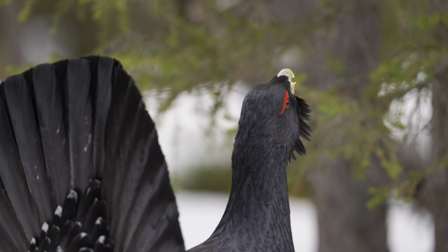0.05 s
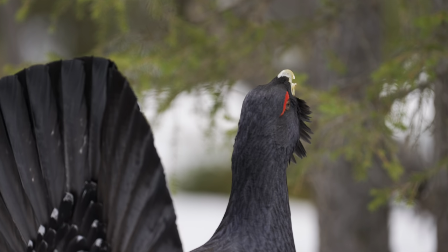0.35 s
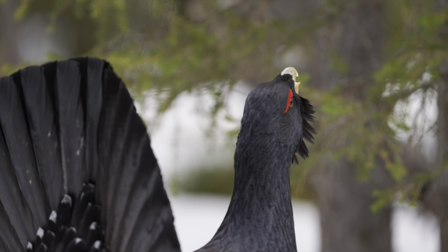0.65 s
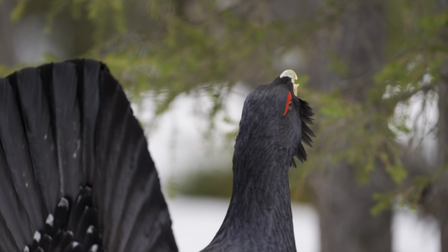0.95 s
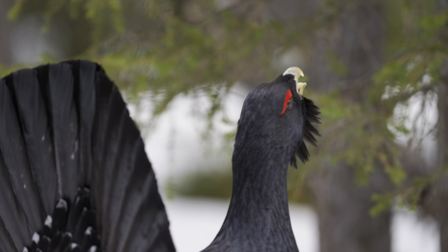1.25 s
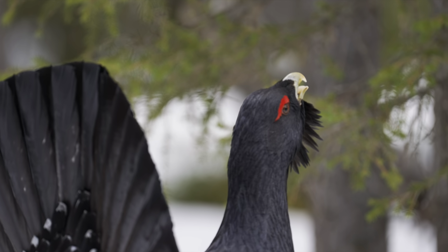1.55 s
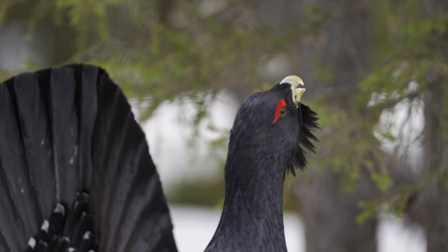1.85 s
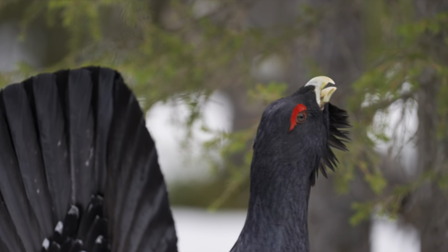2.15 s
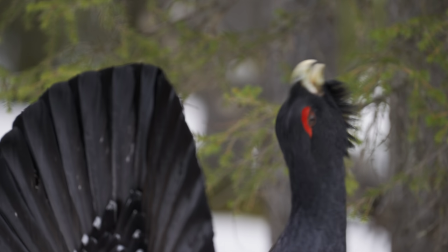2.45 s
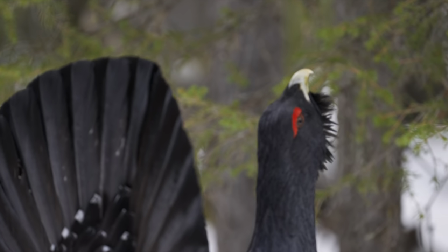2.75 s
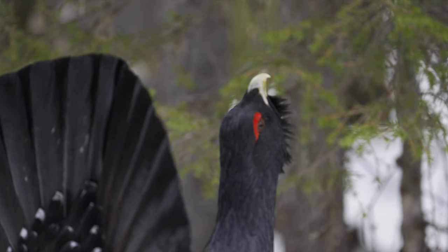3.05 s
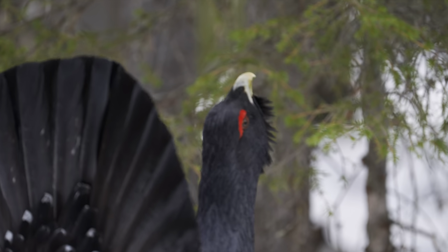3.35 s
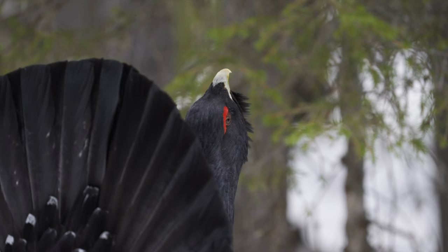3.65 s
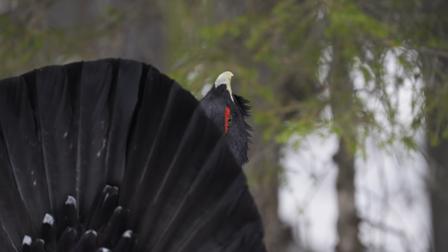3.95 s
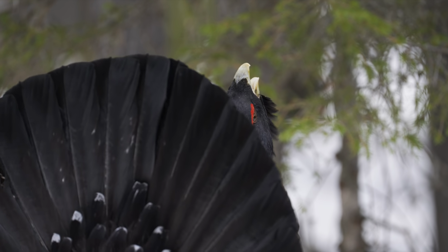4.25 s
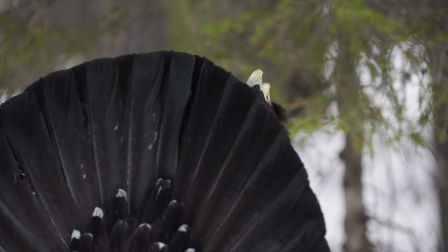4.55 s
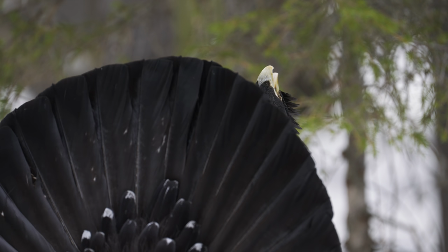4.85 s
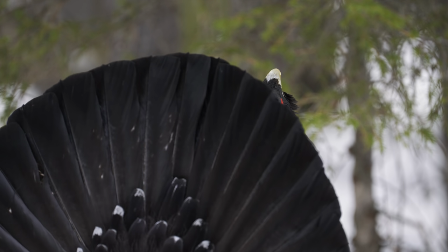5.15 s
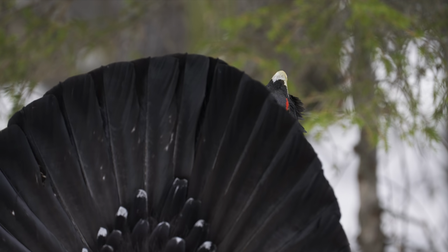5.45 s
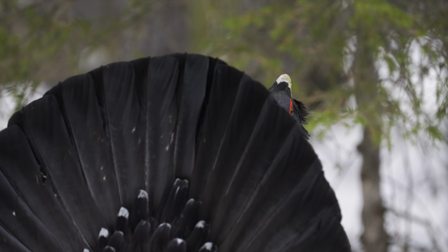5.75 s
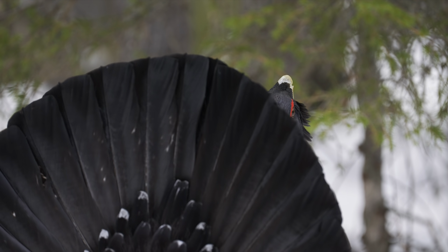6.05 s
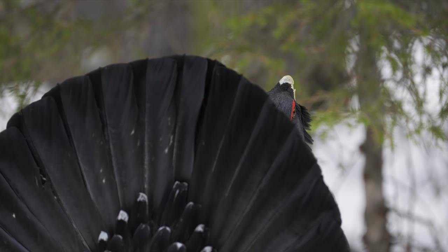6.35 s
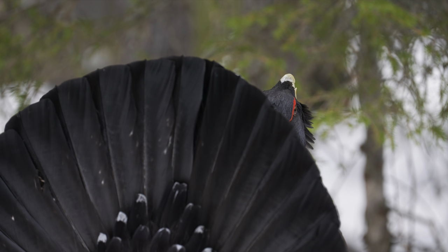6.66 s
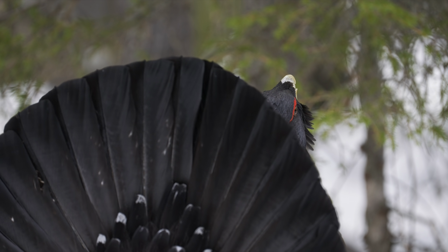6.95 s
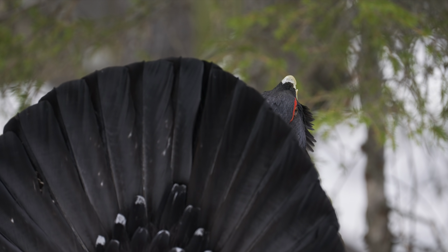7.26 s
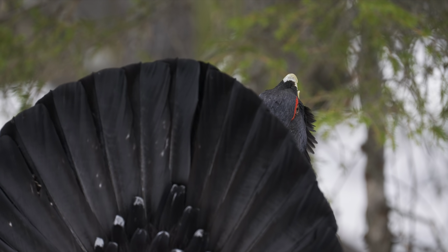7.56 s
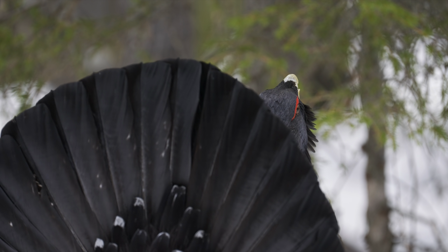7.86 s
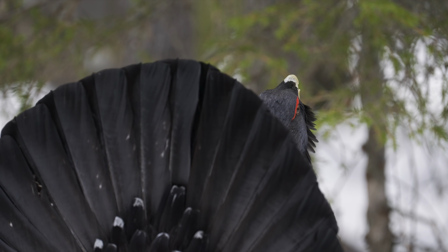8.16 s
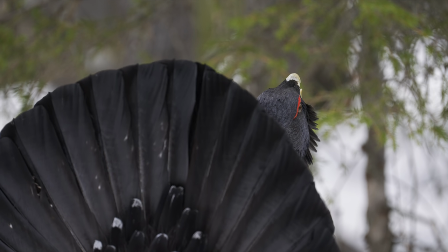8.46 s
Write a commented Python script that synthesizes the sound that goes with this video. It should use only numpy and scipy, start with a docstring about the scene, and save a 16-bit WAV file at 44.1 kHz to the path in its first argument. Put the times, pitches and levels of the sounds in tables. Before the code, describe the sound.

In a still winter forest, a big bird close in front makes pairs of hollow clicks that come faster and tumble together. It switches to raspy, squeaky scraping wheezes for a couple of seconds, pauses, then clicks in slow pairs once more. Thin distant bird whistles, an even hiss of air and a faint deep rumble on the microphone lie underneath.

```python
"""A quiet snowy forest, with a capercaillie displaying close to the microphone, straight ahead.
Hollow double clicks ring the air column of its neck and quicken into a roll and a cork pop. Air forced
through its throat makes a run of scratchy grinding strokes, then the slow clicks start again.
The snow and the trunks echo the bird. Small birds whistle and murmur far off, over a steady hiss of
forest air and microphone noise, and the deep rumble of slow air pressing on the microphone."""
import sys
import numpy as np
from scipy import signal
from scipy.fft import rfft, irfft, next_fast_len
from scipy.io import wavfile
from scipy.ndimage import uniform_filter1d, map_coordinates

SR = 44100
rng = np.random.default_rng(int(sys.argv[2]) if len(sys.argv) > 2 else 0)


def file_out(sig):
    """Save sig as 16-bit WAV at sys.argv[1]."""
    # one column per channel
    cols = np.atleast_2d(sig).T
    # limit, then scale
    lim = np.clip(cols, -1, 1)
    pcm = np.round(lim * 32767).astype(np.int16)
    wavfile.write(sys.argv[1], SR, pcm)


N = 384111

# The close bird's clicks. Each row: start in seconds, relative level in dB, lowest strong resonance
# and main resonance in Hz, hollowness and brightness in dB.
CLICKS = [(0.572, -18, 1480, 2873, 1.5, -1.5), (0.6862, -13.5, 1576, 2813, -13, -4),
          (1.2584, -18, 1490, 2867, -0.5, 0.5), (1.3678, -15, 1510, 2830, -12, -2),
          (1.778, -21.5, 1400, 2817, 1.5, 10), (1.8666, -26, 1470, 2900, 8.5, 15.5),
          (2.1001, -19, 1330, 2853, -5.5, 10.5), (2.167, -30, 1432, 2740, 10, 21.5),
          (2.2961, -21, 1510, 2820, -12, 15.5), (2.4024, -23.5, 1560, 2845, -8, 21),
          (2.4556, -22, 1530, 2674, -15, 13), (2.5005, -17.5, 1500, 2790, -6, 12.5),
          (6.4538, -21.5, 1480, 2780, 10, 12), (6.5866, -15.5, 1485, 2790, -6, -16),
          (7.5604, -20.5, 1492, 2846, 7, 4.5), (7.6857, -13.5, 1458, 2800, -4.5, -11),
          (8.4305, -18.5, 1507, 2770, 2.5, 4), (8.549, -14.5, 1586, 2780, -10.5, 1)]
# First and second click of a pair. Each row: middle resonance in Hz, then gains in dB at that
# resonance, near 3.6 kHz and near 5.5 kHz.
CLICK_PAIR = [(2151, 7.5, -4.5, 3), (2178, 2, -6, -1)]
# The neck's air column at rest. Each row: resonance in Hz, relative level in dB, t60 in seconds.
THROAT_MODES = [(890, -22.5, 0.052), (1499, -5.5, 0.041), (1920, -44, 0.03), (2247, -0.5, 0.034),
                (2680, -27, 0.015), (2926, 7, 0.025), (3213, 7.5, 0.012), (3488, -1, 0.028),
                (4190, -12.5, 0.026), (5075, -21.5, 0.039), (5630, -22.5, 0.027), (6530, -22.5, 0.014),
                (9070, -41.5, 0.018)]
# Its lowest, middle and main strong resonances at rest, in Hz.
REST_HZ = [1490, 2185, 2860]
# Where a click's hollow, middle, main, high and top gains act, in Hz.
COLOUR_HZ = [1500, 2200, 2850, 3600, 5500]
# The wet snap at the edge of a click. Each row: frequency in Hz, relative level in dB.
SNAP_SPECTRUM = [(3000, -32), (5200, 3), (6500, -9), (7600, 0), (9000, 4), (10500, -12), (12500, -14),
                 (15500, -20)]
# The bird turns and its tail fan hides the snap. Each row: time in seconds, snap gain in dB.
TAIL_SHADE = [(0, 1), (3, 3), (5, -2)]
# How the beak radiates. Each row: frequency in Hz, gain in dB.
BEAK_RESPONSE = [(100, -18), (250, -10), (370, -9), (550, -37), (850, -5.5), (1200, -17.5), (1450, -3),
                 (3700, -0.5), (4500, -3), (5300, 0), (6500, -8), (7800, -7.5), (12000, 2.5)]


def throat_clicks(crack_db=-4, crack_t60=0.003, snap_db=-30, snap_t60=0.026, snow_s=0.00295, snow_db=-6):
    """Each click cracks and rings the throat; the snow returns a copy a moment later."""
    out, t = np.zeros(N), np.arange(SR // 16) / SR
    attack = 1 - np.exp(-t / 0.00035)
    mode_hz, mode_db, t60 = np.transpose(THROAT_MODES)[:, :, None]
    for k, (start, db, low_hz, main_hz, hollow, bright) in enumerate(CLICKS):
        middle_hz, middle_db, high_db, top_db = CLICK_PAIR[k % 2]
        # A bright click opens the beak wider: a shorter ring, a lower and weaker middle resonance.
        opening = max(bright, 0)
        damping = 1 + 0.0449 * opening
        middle_hz -= 9 * opening
        middle_db += 0.38 * hollow - 0.25 * opening
        high_db += 0.71 * bright
        colour_db = np.interp(mode_hz, COLOUR_HZ, [hollow, middle_db, 0, high_db, top_db + bright])
        colour_db += rng.normal(0, 1.0, mode_hz.shape)
        tuning = np.interp(mode_hz, REST_HZ, np.array([low_hz, middle_hz, main_hz]) / REST_HZ)
        decay = amp(mode_db + colour_db - 60 * t / t60 * damping)
        ring = np.sum(decay * np.sin(2 * np.pi * mode_hz * tuning * t), axis=0)
        crack = amp(crack_db + high_db / 2 - 60 * t / crack_t60) * np.sin(2 * np.pi * main_hz * t)
        shade_db = np.interp(start, *np.transpose(TAIL_SHADE))
        snap = coloured(rng.standard_normal(len(t)), SNAP_SPECTRUM)
        snap *= amp(snap_db + shade_db + 0.25 * bright - 60 * t / snap_t60)
        click = amp(db - 5) * attack * (ring + crack + snap)
        add(out, start, click)
        add(out, start + snow_s * rng.normal(1, 0.062), amp(snow_db) * click)
    return filtered(out, lambda hz: amp(along(BEAK_RESPONSE, hz)))


# Draws swell out of a rising squeak. Each row: start and length in seconds, relative level in dB,
# final resonance in Hz.
DRAWS = [(3.42, 0.13, -35.5, 3100), (4.086, 0.092, -35.5, 3147), (4.57, .09, -34.5, 3023),
         (5.107, 0.16, -52, 2664)]
# Flicks are short upward chirps. Each row: start and length in seconds, relative level in dB.
FLICKS = [(2.867, 0.044, -52.5), (2.947, 0.037, -38), (3.137, 0.032, -47), (3.187, 0.0117, -50),
          (3.211, 0.028, -34.5), (3.567, 0.022, -42.5), (3.656, 0.042, -36.5), (3.755, 0.026, -38.5),
          (4.209, 0.034, -32), (4.5, 0.031, -33), (4.797, 0.022, -47), (5.017, 0.029, -43)]
# Scrapes start hard, drop in pitch and trail off as a rasp. Each row: start and length in seconds,
# relative level in dB, rise time in seconds.
SCRAPES = [(2.712, 0.11, -36, 0.024), (3.061, 0.045, -43.5, 0.014), (3.295, 0.091, -34.5, 0.0039),
           (3.824, 0.092, -32.5, 0.015), (4.302, 0.1, -31.5, 0.0055), (4.711, 0.031, -33, 0.0055),
           (4.858, 0.11, -35.5, 0.0074)]


def grinding_strokes(t):
    """Each push of breath as (start s, level dB, pressure, resonance Hz, squeak dB)."""
    for start, length, db, final_hz in DRAWS:
        glide_hz = np.interp(t, [0, length], [2440, final_hz])
        yield start, db, breath_pressure(t, 0.68 * length, length), glide_hz, -3.5
    for start, length, db in FLICKS:
        glide_hz = np.interp(t, [0, length], [2400, 3157])
        yield start, db, breath_pressure(t, 0.48 * length, length), glide_hz, -2
    for start, length, db, rise in SCRAPES:
        glide_hz = np.interp(t, [0, 0.026], [3290, 2452])
        squeak_db = -3 - 117 * t  # the squeak dies as the pressure sags
        yield start, db, breath_pressure(t, rise, length, sag_db=7), glide_hz, squeak_db


def breath_pressure(t, rise, length, sag_db=3, release_t60=0.012):
    """Air pressure of one stroke: it builds, sags while held, then lets go."""
    held = np.clip((t - rise) / max(length - rise, 0.001), 0, 1)
    return np.minimum(t / rise, 1) * amp(-sag_db * held - 60 * np.maximum(t - length, 0) / release_t60)


# The throat's rasp with its main resonance at RASP_HZ. Each row: frequency in Hz, relative level in dB.
RASP_SPECTRUM = [(800, -84), (1300, -14), (1700, -5), (1950, -22), (2300, 3), (2800, 4.5), (3300, 7),
                 (3900, -5), (4600, -3), (7000, -61)]
RASP_HZ = 2800
# The breath's hiss, heard close. Each row: frequency in Hz, relative level in dB.
HISS_SPECTRUM = [(2500, -71), (4300, -5), (5500, 8), (6500, 6.5), (7100, -1.5), (7700, -13), (8900, -14.5),
                 (9900, -9.5), (11000, -20), (12800, -19), (15000, -55)]


def grinding(width_hz=230, snow_s=0.0027, snow_db=-8):
    """Gritty bursts of air through a gliding throat; weak flow favours the squeak, strong the rasp."""
    out, t = np.zeros(N), np.arange(SR // 4) / SR
    for start, db, pressure, hz, squeak_db in grinding_strokes(t):
        weakness_db = -40 - db  # weaker strokes are hissier and squeakier
        bright_db = -7 + 0.29 * weakness_db
        grit = unit(amp(0.5 * wobble(693, len(t))))  # the flow catches and slips
        rasp = coloured(grit * rng.standard_normal(len(t)), RASP_SPECTRUM)
        rasp = map_coordinates(rasp, [np.cumsum(hz) / RASP_HZ], mode="mirror")  # resonances glide as one
        rasp += amp(bright_db / 2 - 4) * narrow(0.7 * hz, width_hz)  # an open throat's lower resonance
        breath = patchy(grit * rng.standard_normal(len(t)), depth_db=2.8)
        hiss = amp(bright_db - 1) * coloured(breath, HISS_SPECTRUM)
        squeak = narrow(hz, width_hz) + amp(bright_db - 3) * narrow(2 * hz, width_hz)
        squeak *= amp(squeak_db + 0.22 * weakness_db)
        add(out, start, amp(db) * (pressure ** 1.25 * (amp(-4) * rasp + hiss) + pressure * squeak))
    add(out, snow_s, amp(snow_db) * out)  # the snow's reflection
    return out


# Trunks around the microphone. Each row: echo delay in seconds, relative level in dB.
TRUNK_ECHOES = [(0.0121, -15), (0.016, -14.5), (0.0193, -14), (0.029, -24), (.0405, -22.5), (0.0426, -15.5)]
# The tail from deeper in the forest. Each row: frequency in Hz, t60 in seconds.
FOREST_DECAY = [(300, 0.16), (1500, 0.55), (3000, 0.7), (6000, 1), (12000, 0.15)]
# The raised beak sends more treble into the trees. Each row: frequency in Hz, echo gain in dB.
ECHO_COLOUR = [(1000, -6), (2100, -3.5), (2850, -1), (3500, 4.5), (6000, 0.5), (9000, 11)]


def forest_echoes(sound, near_db=-13, near_t60=0.4, far_db=-19):
    """Trunk echoes, scatter from near branches and a faint long tail; all shift as the bird turns."""
    out, block = np.zeros(N), SR // 4
    for start in range(0, N, block):  # fresh echo paths every quarter second
        hz, t, noise = signal.stft(rng.standard_normal((2, SR)), SR, nperseg=256)
        far_t60 = along(FOREST_DECAY, hz)[:, None]
        near = signal.istft(noise[0] * amp(-60 * t / near_t60), SR, nperseg=256)[1]
        far = signal.istft(noise[1] * amp(-60 * t / far_t60), SR, nperseg=256)[1]
        response = np.zeros(SR)
        add(response, 0.009, amp(near_db) * near / np.linalg.norm(near))
        add(response, 0.035, amp(far_db) * far / np.linalg.norm(far))
        for delay, db in TRUNK_ECHOES:
            add(response, delay + rng.normal(0, 0.0005), amp([db - 1]))
        add(out, start / SR, signal.fftconvolve(sound[start:start + block], response))
    return filtered(out, lambda hz: amp(along(ECHO_COLOUR, hz)))


# Small birds far off. Each row: start and length in seconds, starting pitch in Hz, relative level in dB,
# fall in Hz per second.
WHISTLES = [(0.34, 0.059, 5930, -57, 11900), (.395, .1, 5380, -59, 1210), (0.417, 0.16, 4640, -63, 700),
            (0.93, 0.16, 4250, -61.5, 2060), (1.565, 0.38, 4320, -59, 800), (1.818, .28, 4350, -57, 300),
            (2.085, .28, 4280, -54, 501), (4.601, 0.35, 4300, -55.5, 70), (5.92, 0.23, 4900, -63.5, 1470),
            (7.805, 0.25, 4260, -61, 100)]


def songbirds(blur_hz=190, gain_db=-6.5, rise_s=0.016, release_t60=0.12):
    """Thin far whistles that sink in pitch, blurred by their way through the trees."""
    out, t = np.zeros(N), np.arange(SR // 2) / SR
    for start, length, hz, db, fall in WHISTLES:
        swell = np.minimum(t / rise_s, 1) * amp(-60 * np.maximum(t - length, 0) / release_t60)
        glide_hz = hz - fall * np.minimum(t, length)
        add(out, start, amp(db + gain_db) * swell * narrow(glide_hz, blur_hz))
    return out


# Faint sounds, near and far. Each row: start and length in seconds, centre in Hz, level in dB.
NOISE_SWELLS = [(0, 0.062, 2800, -51.5), (2.66, 0.016, 870, -55.5), (2.734, 0.0079, 990, -49.5),
                (3.955, 0.031, 1410, -52.5), (4.44, 0.024, 2250, -46.5), (5.703, 0.12, 1250, -60),
                (5.71, 0.14, 2860, -54), (6.099, 1.13, 2530, -59), (6.979, 0.22, 3300, -54.5),
                (7.225, 0.072, 3130, -55)]


def pops_and_murmurs():
    """Soft noise swells: a click's fading echo, low pops amid the grinding, distant bird chatter."""
    out = np.zeros(N)
    for start, length, hz, db in NOISE_SWELLS:
        swell = np.sin(np.linspace(0, np.pi, round(length * SR)))
        band = [(hz / 3, -30), (hz / 1.02, 0), (hz * 1.2, 0), (hz * 1.9, -30)]
        add(out, start, amp(db) * swell * coloured(rng.standard_normal(len(swell)), band))
    return out


# Slow air movement at the microphone. Each row: time in seconds, relative level in dB.
AIR_SWELL = [(0.0, -32), (0.36, -57.5), (0.53, -36.5), (1.33, -51.5), (1.91, -38.5), (2.3, -41.5),
             (2.57, -36.5), (2.86, -42.5), (3.3, -42.5), (3.34, -44), (3.61, -42.5), (4.26, -50.5),
             (4.72, -40), (5.35, -44.5), (6.01, -62), (8.7, -69)]
# The rumble it makes. Each row: frequency in Hz, relative level in dB.
RUMBLE_SPECTRUM = [(5, -14.5), (11, 8.5), (15, 5.5), (20, -4), (28, -18.5), (45, -67.5)]
# The drone just above the rumble. Each row: frequency in Hz, relative level in dB.
DRONE_SPECTRUM = [(20, -3), (45, 6), (62, -18), (100, -9), (130, -22.5), (200, -28), (400, -46)]


def microphone_rumble(rumble_db=3, drone_db=-46):
    """Slow air movement presses on the microphone; a faint low drone swells with it."""
    swell_db = np.interp(np.arange(N) / SR, *np.transpose(AIR_SWELL))
    pressure = amp(swell_db + rumble_db) * coloured(rng.standard_normal(N), RUMBLE_SPECTRUM)
    drone = amp(swell_db / 2 + drone_db) * coloured(rng.standard_normal(N), DRONE_SPECTRUM)
    return pressure * signal.windows.tukey(N, 0.02) + drone


# Forest air and the microphone's own hiss. Each row: frequency in Hz, relative level in dB.
BACKGROUND_SPECTRUM = [(88, -44), (150, -19.5), (264, -25), (308, -11), (492, -14.5), (587, -8.5),
                       (1010, 0), (1470, -1), (2740, 0.5), (3020, 4.5), (4200, -2.5), (5410, -4),
                       (6080, -3.5), (9710, -6), (15800, -10.5)]
# How alike the two channels hiss. Each row: frequency in Hz, left-right correlation.
BACKGROUND_CORRELATION = [(1800, 1), (3300, .998), (5000, .94), (8000, .7), (13000, .62)]


def background_hiss(level_db=-57.5):
    """Steady background hiss: centred forest air, with wide microphone hiss in the treble."""
    def spread(hz):
        return np.arccos(np.clip(along(BACKGROUND_CORRELATION, hz), -1, 1)) / 2
    mid = filtered(rng.standard_normal(N), lambda hz: np.cos(spread(hz)))
    side = filtered(rng.standard_normal(N), lambda hz: np.sin(spread(hz)))
    return amp(level_db) * coloured(np.array([mid + side, mid - side]), BACKGROUND_SPECTRUM)


def amp(db):
    """Decibels to gain."""
    return 10 ** (np.asarray(db) / 20)


def unit(x):
    """Scale to rms 1."""
    return x / np.sqrt(np.mean(x ** 2) + 1e-20)


def along(points, hz):
    """(Hz, value) points read on a log axis."""
    point_hz, values = np.transpose(points)
    return np.interp(np.log(hz + 1), np.log(point_hz + 1), values)


def filtered(x, response):
    """x times a response of frequency."""
    size = x.shape[-1]
    padded = next_fast_len(size + 8192)
    return irfft(rfft(x, padded) * response(np.fft.rfftfreq(padded, 1 / SR)), padded)[..., :size]


def coloured(x, spectrum):
    """x shaped by a (Hz, dB) spectrum, at rms 1."""
    return unit(filtered(x, lambda hz: amp(along(spectrum, hz))))


def wobble(rate, size):
    """A smooth random curve, rate knots a second."""
    return map_coordinates(rng.standard_normal(size), [np.arange(size) * rate / SR], mode="mirror")


def narrow(hz, width_hz):
    """Noise ringing in a resonance that follows the curve hz."""
    phase = 2 * np.pi * np.cumsum(hz) / SR
    return unit(wobble(width_hz, len(hz)) * np.cos(phase) + wobble(width_hz, len(hz)) * np.sin(phase))


def patchy(x, depth_db):
    """x with bands that come and go every few hundredths of a second."""
    bands = signal.stft(x, nperseg=256)[2]
    patches = uniform_filter1d(rng.standard_normal(bands.shape), size=4, axis=0)
    patches = unit(uniform_filter1d(patches, size=14, axis=1))
    return unit(signal.istft(bands * amp(depth_db * patches), nperseg=256)[1][:len(x)])


def add(track, start, sound):
    """Mix a sound into the track at start seconds."""
    part = track[max(round(start * SR), 0):][:len(sound)]
    part += sound[:len(part)]


def scene(far_wet_db=6):
    """The bird close and straight ahead, the forest around it; far whistles carry more echo."""
    direct = throat_clicks() + grinding() + pops_and_murmurs()
    whistles = songbirds()
    echoes = forest_echoes(direct + amp(far_wet_db) * whistles)
    return direct + whistles + echoes + microphone_rumble() + background_hiss()


def record(dry, top_hz=15800):
    """Nothing is kept above the band limit."""
    return filtered(dry, lambda hz: hz < top_hz)


dry = scene()
out = record(dry)
file_out(out)
```